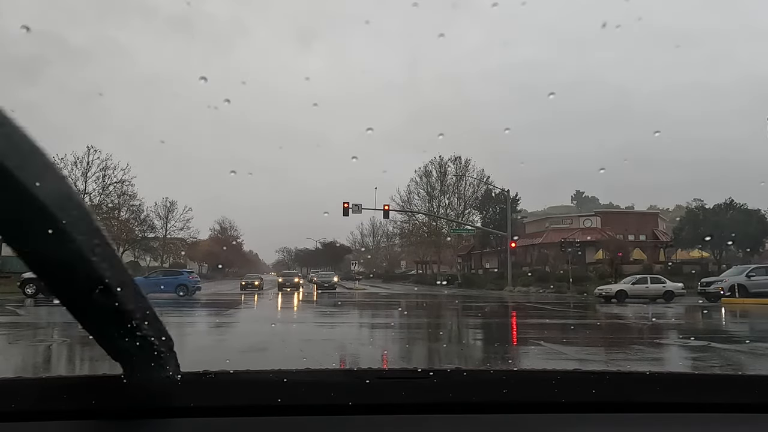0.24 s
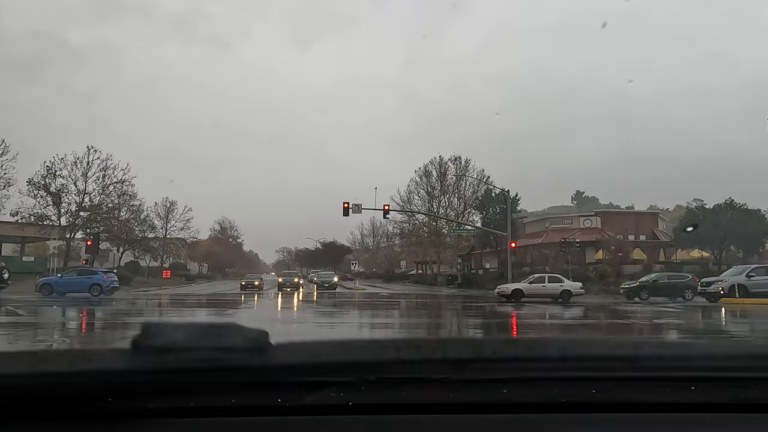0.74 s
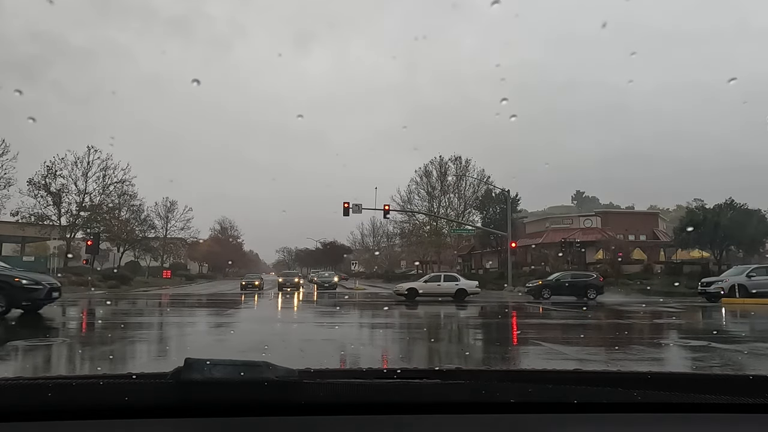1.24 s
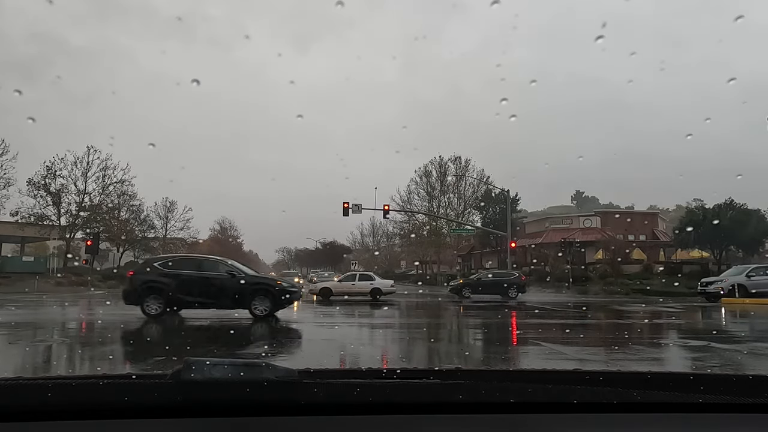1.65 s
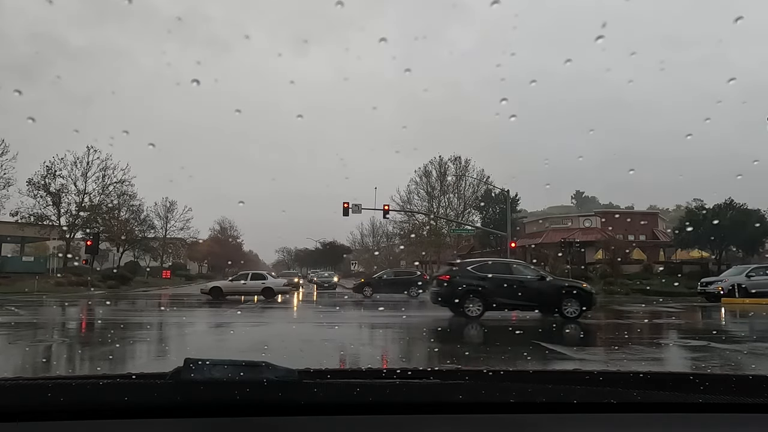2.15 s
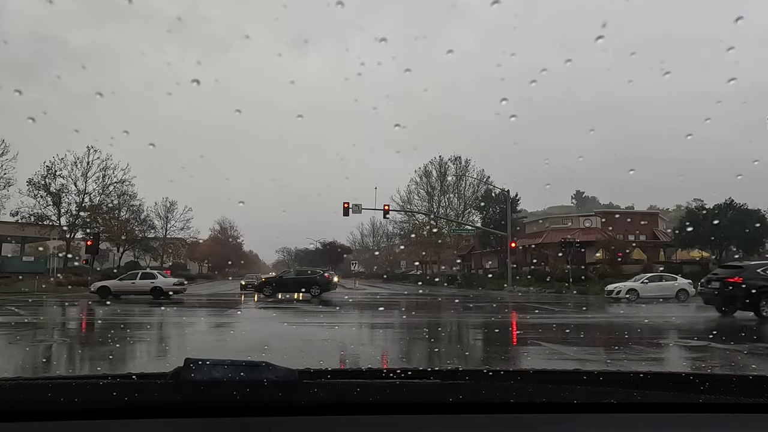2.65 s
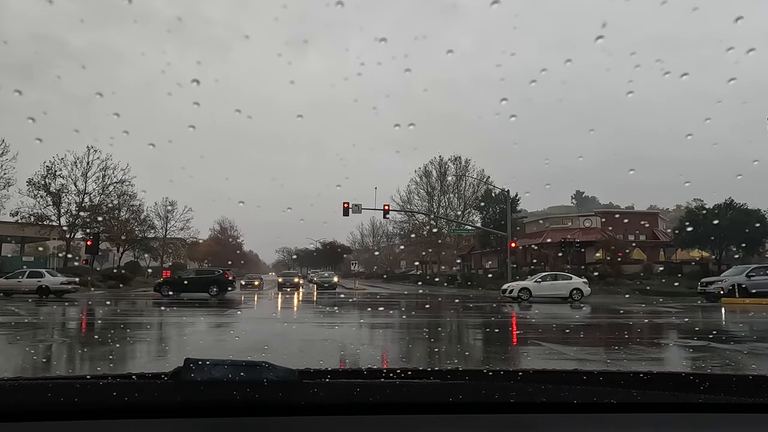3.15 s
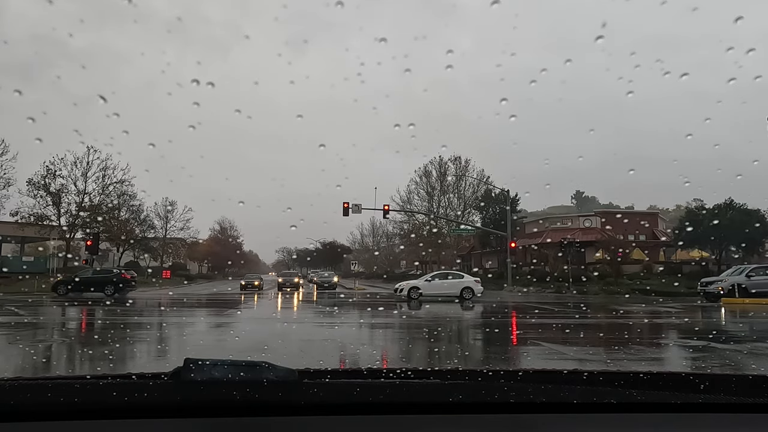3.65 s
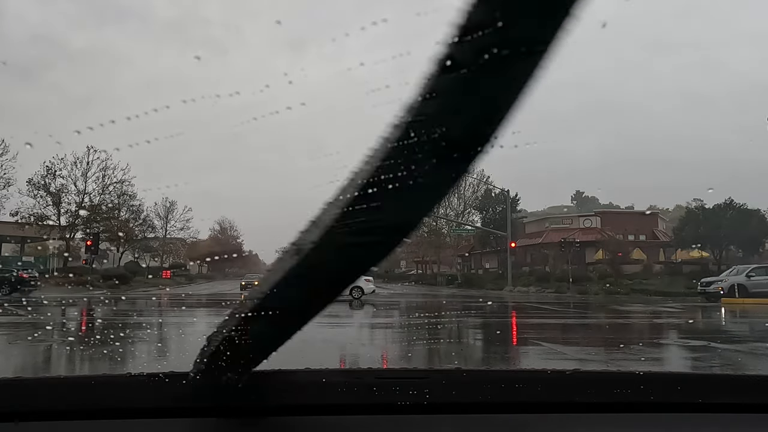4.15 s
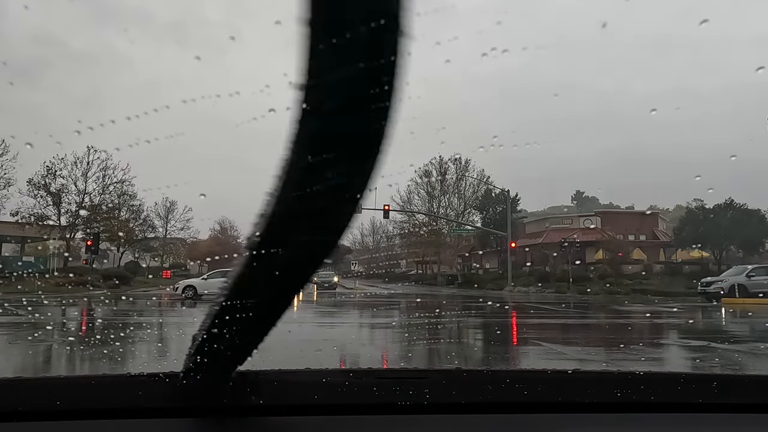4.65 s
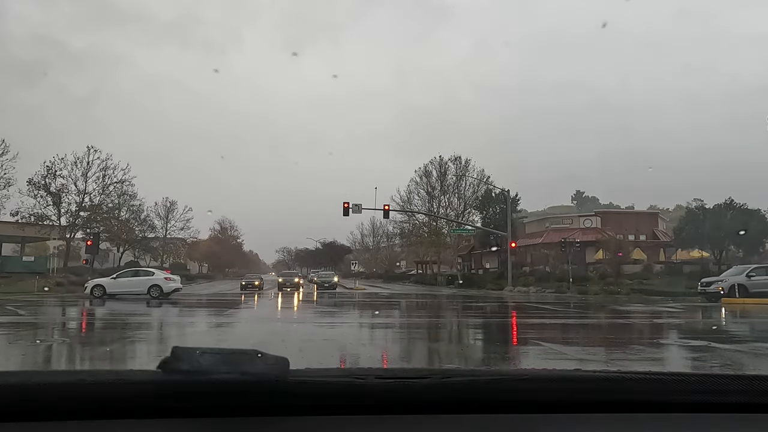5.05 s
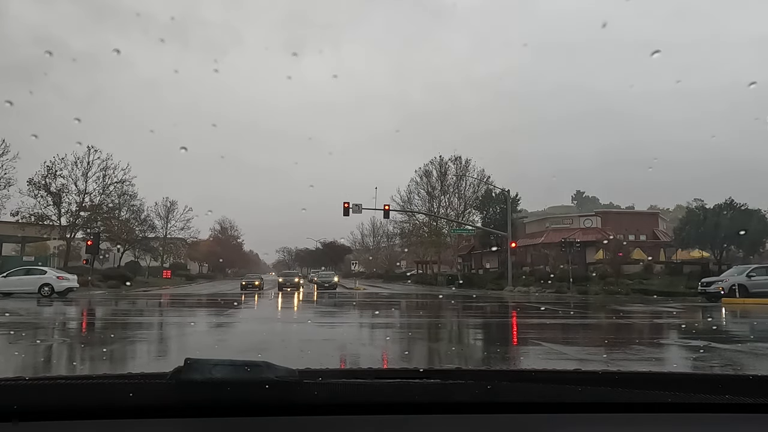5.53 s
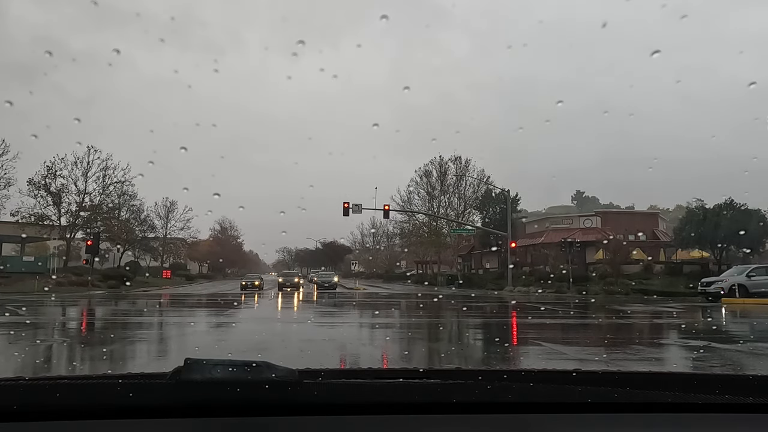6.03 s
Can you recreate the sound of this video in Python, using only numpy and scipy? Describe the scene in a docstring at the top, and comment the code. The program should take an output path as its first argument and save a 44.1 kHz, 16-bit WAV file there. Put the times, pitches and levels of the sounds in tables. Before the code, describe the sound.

Steady low engine idle and turn-signal clicking in a car cabin, with juddering wet wiper sweeps near the start and around four seconds.

```python
"""A six-cylinder engine idles and a turn signal ticks inside a car waiting at a wet junction.
The wipers sweep twice: the motor hums, rubber squeaks, judders and groans in stick-slip, and the arms knock.
Wet traffic hisses faintly outside; something crackles crisply close by, mostly near the end.
Hums are sines, squeals are stacks of partials, and the rest is noise or clicks coloured by what they strike."""
import sys
import numpy as np
from scipy import signal
from scipy.fft import rfft, irfft, next_fast_len
from scipy.io import wavfile
from scipy.ndimage import uniform_filter1d

SR = 44100
rng = np.random.default_rng(int(sys.argv[2]) if len(sys.argv) > 2 else 0)


def dump(signal):
    """Clip the signal to [-1, 1] and save it as 16-bit WAV at the path in sys.argv[1]."""
    limited = np.clip(np.atleast_2d(signal).T, -1, 1)
    pcm = np.round(limited * 32767).astype(np.int16)
    wavfile.write(sys.argv[1], SR, pcm)


N = 277389
TIME = np.arange(N) / SR  # seconds

# Scrape of rubber on the glass. Each row: frequency in Hz, relative density in dB per Hz.
RASP = [(250, -2.5), (550, 4), (800, 3), (1000, 1.5), (1350, -1.5), (1650, -6.5), (2200, -10.5),
        (2900, -27), (5000, -37)]
# Snap of the water film. Each row: frequency in Hz, relative density in dB per Hz.
SPRAY = [(1500, -13.5), (2500, 7), (3000, 4.5), (3700, 9), (4800, 4.5), (5600, -3.5), (6800, -8),
         (8000, -18), (9700, -35), (11500, -45), (16000, -47.5)]
# Crisp, brittle colour of crackles and fizz. Each row: frequency in Hz, relative density in dB per Hz.
CRISP = [(700, -7), (1600, 3.5), (2900, -10.5), (4300, 5.5), (5500, 4.5), (6500, -3), (7800, -4.5),
         (9500, -12), (12000, -21.5), (16000, -31)]
# Stereo lean of sounds on the glass. Each row: frequency in Hz, left minus right in dB.
GLASS_SIDE = [(200, -1), (400, 3), (1200, 3.5), (8000, 2), (15000, 8)]
# The groan before the arms turn, wavering with the grip.
# Each row: time in seconds, slips per second, level in dB, brightness in dB per octave.
GROAN_CURVE = [(4.238, 210, -9, -3.5), (4.262, 222, -18, -8), (4.288, 200, -6.5, -7), (4.305, 178, -9, -6),
               (4.328, 177, -10.5, 0.5), (4.35, 192, -8, -3.5), (4.372, 208, -11, -1),
               (4.408, 187, -5.5, -2.5), (4.434, 197, -11.5, -1), (4.456, 216, -14, 4.5),
               (4.49, 210, -18.5, 2)]

# One wiper cycle, out and back: starts and length in seconds; the first is already under way.
SWEEP_STARTS, SWEEP_S = [-.31, 3.93], 1.33


def from_db(db):
    """Decibels to gain."""
    return 10 ** (np.asarray(db) / 20)


def rms_one(x):
    """Scale to unit power."""
    return x / np.sqrt(np.mean(x ** 2) + 1e-20)


def in_time(rows):
    """Each column of a curve, drawn as straight lines through every sample."""
    s, *columns = np.transpose(rows)
    return [np.interp(TIME, s, column) for column in columns]


def at_hz(points, hz):
    """Read a spectrum on a log-frequency axis."""
    point_hz, value = np.array(points).T
    return np.interp(np.log(hz + 1e-6), np.log(point_hz), value)


def pan(side_db):
    """Left and right gains for a level difference, left minus right."""
    return from_db(np.array([[.5], [-.5]]) * side_db)


def drift(rate_hz):
    """Smooth random wandering with spread 1, computed every 40 samples."""
    step = 40
    r = np.exp(-2 * np.pi * rate_hz * step / SR)
    raw = rng.standard_normal(N // step + 2002)
    slow = signal.lfilter([1], [1, -2 * r, r * r], raw)[2000:]  # skip the filter's start
    return np.interp(np.arange(N) / step, np.arange(len(slow)), rms_one(slow))


def swell(start, length, attack, release, sag_db=0):
    """Rise, hold while sagging by so many dB a second, then fall 60 dB in the release time."""
    age = np.maximum(TIME - start, 0)
    held = np.minimum(age, length)
    released = np.maximum(age - length, 0)
    return np.minimum(age / attack, 1) * from_db(-sag_db * held - 60 * released / release)


def clicks(times, levels_db):
    """One impulse per contact."""
    out = np.zeros(N)
    samples = np.round(np.asarray(times) * SR).astype(int)
    out[np.clip(samples, 0, N - 1)] = from_db(levels_db)
    return out


def bounces(times, levels_db, gap, loss_db, count):
    """Each contact repeats a few times, weaker each time."""
    return sum(clicks(times + k * gap, levels_db - k * loss_db) for k in range(count))


def die_away(hits, t60):
    """An envelope that each hit kicks up and that then decays 60 dB in t60 seconds."""
    return signal.lfilter([1], [1, -from_db(-60 / (t60 * SR))], hits + 1e-18)


def ring(hits, hz, t60):
    """A resonant mode: a unit click sets a decaying sine of height 1 ringing."""
    r, w = from_db(-60 / (t60 * SR)), 2 * np.pi * hz / SR
    return signal.lfilter([0, np.sin(w)], [1, -2 * r * np.cos(w), r * r], hits + 1e-18)


def noise(spectrum, force=1, side=None, pulses=0):
    """A random force, plus any clean pulses, coloured by a causal body and most alike in both ears in the bass."""
    # Stereo width. Each row: frequency in Hz, left-right likeness from 0 to 1.
    likeness = [(70, .994), (250, .975), (500, .87), (1000, .82), (2000, .62), (8000, .62)]
    size = 2 * next_fast_len(N // 2 + 4096)
    hz = np.fft.rfftfreq(size, 1 / SR)
    gain = rms_one(from_db(at_hz(spectrum, hz)) / (1 + (hz / spectrum[-1][0]) ** 4))
    cepstrum = irfft(np.log(gain + 1e-9), size)
    body = np.exp(rfft(cepstrum * (1 + np.sign(np.fft.fftfreq(size)))))  # minimum phase: nothing sounds early
    # The middle gets the clean pulses, the stereo difference gets them with random signs and strengths.
    pulse_pair = pulses * np.array([np.ones(N), rng.standard_normal(N)])
    mid, apart = rfft(rng.standard_normal((2, N)) * force + pulse_pair, size)
    alike = np.clip(at_hz(likeness, hz), 0, 1)
    both = np.sqrt((1 + alike) / 2) * mid + np.sqrt((1 - alike) / 2) * apart * [[1], [-1]]
    side_db = at_hz(side, hz) if side else -.9
    return irfft(both * body * pan(side_db), size)[:, :N]


FIRING_HZ = 32.0  # steady idle, three firings a crank turn


def engine():
    """Sines at multiples of the crank rate; uneven combustion makes them waver, the lowest most."""
    # Low shudder. Each row: multiple of the crank rate, dB relative to the shudder level.
    shudder_orders = [(2, -6.5), (3, -3), (4, -7.5)]
    # Hum above it. Each row: multiple of the crank rate, dB relative to the hum level.
    hum_orders = [(6, -0.5), (6.5, -19), (9, -27.5), (12, -13), (18, -18.5), (24, -25), (28, -25.5),
                  (30, -23.5), (72, -34), (78, -41.5), (88, -41)]
    crank = 2 * np.pi * FIRING_HZ * TIME / 3
    out = 0
    for orders, level_db, depth in ((shudder_orders, -25, .2), (hum_orders, -24, .12)):
        for multiple, db in orders:
            phase = multiple * crank + rng.uniform(0, 2 * np.pi) + depth * drift(2)
            strength = from_db(level_db + db) * (1 + depth * drift(3.5))
            out = out + strength * np.sin(phase)
    return np.sqrt(2) * out * pan(-1.0)


def background(rumble_db=-31, throb=0.22, road_db=-56.5, traffic_swing_db=1.5):
    """Body rumble that throbs at twice the firing rate, and the fluctuating hiss of tyres on the wet road."""
    # Body rumble. Each row: frequency in Hz, relative density in dB per Hz.
    rumble_colour = [(12, -33.5), (22, -10.5), (38, -6), (52, -8.5), (68, 3.5), (80, -9.5), (98, -19),
                     (130, -14), (210, -15.5), (275, -24), (315, -18.5), (410, -26.5), (540, -27.5),
                     (800, -30.5), (1100, -42), (2000, -63.5)]
    # Wet road. Each row: frequency in Hz, relative density in dB per Hz.
    road_colour = [(600, -15), (1100, 2), (1650, 2.5), (2050, -4.5), (2900, -7.5), (3800, -6.5),
                   (4700, -9.5), (6000, -16.5), (7700, -23), (9500, -27.5), (11500, -47), (16000, -48.5)]
    firing = 2 * np.pi * FIRING_HZ * TIME
    rumble = from_db(rumble_db) * noise(rumble_colour) * (1 + throb * np.sin(2 * firing))
    road = from_db(road_db + traffic_swing_db * drift(10)) * noise(road_colour)
    return rumble + road


def wiper_motor(motor_hz=111.4, level_db=-29, waver=0.61, spin_up_s=0.44, hold_s=0.73, release_s=1.5):
    """The motor hums unsteadily through the bulkhead and eases off as the arms come back down."""
    load = sum(swell(s, hold_s, spin_up_s, release_s) for s in SWEEP_STARTS)
    hum = np.sqrt(2) * np.sin(2 * np.pi * motor_hz * TIME + waver * drift(32))
    return from_db(level_db) * load * (1 + waver * drift(41)) * hum * pan(-.9)


def friction(attack_s=.018, release_s=.12):
    """Strength of thrum, rasp and spray: a quiet glide on the water film through each sweep, plus the catches."""
    # The rubber catches and drags. Each row: start in seconds, length in seconds,
    # then thrum, rasp and spray in dB at the start of the catch, before the trims in drag().
    catches = [(0.141, 0.065, -28.5, -38, -46), (0.256, 0.018, -27, -38, -50.5),
               (0.93, 0.11, -34.5, -56, -63), (3.885, 0.049, -20, -34, -52.5),
               (4.005, 0.067, -21, -28, -61), (4.076, 0.073, -20, -28, -52), (4.154, .085, -19.5, -32, -42),
               (4.25, 0.043, -25.5, -29.5, -44), (4.292, .18, -26, -36.5, -48.5),
               (5.186, .05, -42, -54.5, -61)]
    glide_db = [-44.5, -66, -80.5]  # thrum, rasp, spray
    sags_db = np.array([[25.5], [-2.5], [3]])  # dB per second during a catch; the rasp grows slightly
    gliding = sum(swell(s, SWEEP_S, attack_s, release_s) for s in SWEEP_STARTS)
    power = np.outer(from_db(glide_db), gliding) ** 2
    for start, length, *levels_db in catches:
        shape = swell(start, length, attack_s, release_s, sags_db)
        power = power + (from_db(levels_db)[:, None] * shape) ** 2
    return np.sqrt(power)


def drag(thrum_trim_db=4.0, rasp_trim_db=6, fizz_trim_db=-18,
         jitter=0.13, uneven_db=0.5, slip_t60=0.0072, smooth=0.19):
    """The blade lets go in slips, less evenly the harder it thrums; each thumps the glass and snaps the water."""
    # Thump of the glass. Each row: frequency in Hz, relative density in dB per Hz.
    thrum_colour = [(60, -12.5), (120, 1), (200, 5.5), (300, -4), (380, -6.5), (480, -14.5), (800, -19.5),
                    (1600, -40)]
    resting_hz = 195.95  # mean slip rate outside the groan
    thrum, rasp, spray = friction()
    slip_hz = np.interp(TIME, *np.transpose(GROAN_CURVE)[:2], left=resting_hz, right=resting_hz)
    slip_hz = slip_hz * (1 + jitter * thrum / thrum.max() * drift(70))
    turns = np.floor(np.cumsum(slip_hz) / SR)
    slips = (np.diff(turns, prepend=0) > 0) * from_db(uneven_db * rng.standard_normal(N))
    chatter = rms_one(die_away(slips, slip_t60) + smooth)
    low = noise(thrum_colour, from_db(thrum_trim_db) * thrum * chatter)
    middle = noise(RASP, from_db(rasp_trim_db) * rasp * np.sqrt(chatter), GLASS_SIDE)
    high = noise(SPRAY, spray * chatter, GLASS_SIDE)
    hardest = rasp ** 2 / rasp.max()  # only the hardest rubbing fizzes
    fizz = noise(CRISP, from_db(fizz_trim_db) * hardest * chatter, GLASS_SIDE)
    return low + middle + high + fizz


def stick_slip(start, slip_hz, gain, bright_db, flutter_db=2.0, dispersion=0.61, upper_smear=.12):
    """Stick-slip for half a second: harmonics coloured by the windscreen, the upper ones unsteady."""
    # How the windscreen radiates a squeal. Each row: frequency in Hz, relative level in dB.
    windscreen = [(150, -11), (200, 9), (370, 2), (560, -1.5), (660, -16), (740, -5.5), (860, -27),
                  (1000, -18.5), (1150, -29), (1340, -29), (1700, -54), (4000, -92)]
    on = np.arange(SR // 2) + max(int(start * SR), 0)
    phase = 2 * np.pi * np.cumsum(slip_hz)[on] / SR
    k = np.arange(1, 15)[:, None]  # harmonic numbers
    tilt_db = np.broadcast_to(bright_db, N)[on] * np.log2(k)
    partials = from_db(at_hz(windscreen, k * slip_hz[on]) + tilt_db)
    partials = partials / np.sqrt(np.sum(partials ** 2, axis=0) / 2)
    flutter = rms_one(uniform_filter1d(rng.standard_normal(partials.shape), size=700))
    # Phase wander in radians, growing with each partial above the third.
    smear = upper_smear * np.maximum(k - 3, 0) * flutter[::-1]
    unsteady = from_db(flutter_db * np.log10(k) * flutter)
    waves = partials * unsteady * np.cos(k * phase - dispersion * k ** 2 + smear)
    side = pan(at_hz(GLASS_SIDE, k[:, 0] * np.mean(slip_hz[on])))
    out = np.zeros((2, N))
    out[:, on] = side @ waves * gain[on]
    return out


def slip_pulses(slip_hz, uneven_db=3.0):
    """One sharp pulse each time the rubber lets go, each of its own strength; about unit power."""
    turns = np.cumsum(slip_hz) / SR
    nearest = np.round(turns).astype(int)
    strength = from_db(uneven_db * rng.standard_normal(N)[nearest])
    triangle = np.maximum(1 - np.abs(turns - nearest) * SR / slip_hz, 0)
    return triangle * np.sqrt(SR / slip_hz) * strength


def squeals(attack_s=.01, release_s=.048):
    """The rubber locks into short squeals gliding in pitch; their slips scrape the glass in step."""
    # Each row: start in seconds, length in seconds, slips per second, glide in octaves per second, level in dB,
    # brightness in dB per octave, pitch jitter as a share, scrape level in dB.
    squeal_rows = [(0, 0.042, 480, -0.5, -36.5, 1, .01, -64),
                   (0.092, 0.017, 410, -1, -35.5, 13, 0.017, -47),
                   (0.14, 0.017, 333, -1.5, -24.5, -9, 0.022, -39.5),
                   (0.16, 0.044, 197, 0.5, -20.5, -6, .02, -37.5),
                   (0.186, 0.031, 290, 2, -28.5, 11.5, 0.026, -46),
                   (0.216, 0.056, 336, -0.8, -24, 1.5, 0.027, -38.5),
                   (0.267, 0.016, 240, -4.5, -26, -7, .04, -44),
                   (3.956, 0.047, 346, -1.8, -17.5, 10, .016, -36),
                   (4.001, 0.086, 280, 1, -21, -2.5, 0.038, -38.5),
                   (4.078, 0.032, 233, -2, -19, 9.5, 0.029, -27.5),
                   (4.113, 0.037, 330, 0.4, -18, 1, .018, -32),
                   (4.154, 0.049, 197, -1.5, -8.5, -7, .015, -33.5),
                   (4.209, 0.032, 174, 1, -15.5, -4.5, .015, -34.5)]
    # Scrape of a slip on wet glass. Each row: frequency in Hz, relative density in dB per Hz.
    scrape_colour = [(500, -12.5), (1000, 5.5), (1500, 1.5), (2100, -13), (2900, -18.5), (4400, -21),
                     (7500, -28.5), (10000, -40)]
    tones, pulses = 0, 0
    for start, length, hz, glide, level_db, bright_db, rough, scrape_db in squeal_rows:
        slip_hz = hz * 2 ** (glide * np.clip(TIME - start, 0, length)) * (1 + rough * drift(114))
        gate = swell(start, length, attack_s, release_s)
        tones = tones + stick_slip(start, slip_hz, gate * from_db(level_db), bright_db)
        pulses = pulses + gate * from_db(scrape_db) * slip_pulses(slip_hz)
    return tones + noise(scrape_colour, 0, GLASS_SIDE, pulses)


def knocks(thud_t60=0.077, clack_t60=0.065, click_t60=0.032, rebound_s=.016):
    """The arms turn over or park and rebound once: a dull body thud, a plastic clack and a linkage click."""
    # Each row: time in seconds, thud, clack and linkage click in dB, loss on the rebound in dB.
    knock_rows = [(0.071, -30, -31, -52.5, 14.5), (0.368, -24.5, -30, -36.5, 23.5),
                  (0.998, -19, -39, -40.5, 6.5), (3.822, -46, -40, -33, 9.5), (3.901, -12, -24, -41, 2),
                  (4.524, -14, -19, -38.5, 8.5), (5.249, -17.5, -37, -50, 7.5)]
    # Body thud. Each row: frequency in Hz, relative density in dB per Hz.
    thud_colour = [(40, -7), (100, 4.5), (170, 0.5), (250, -6.5), (380, -15), (600, -26), (1200, -35.5)]
    # Plastic clack. Each row: frequency in Hz, relative density in dB per Hz.
    clack_colour = [(200, -3), (500, 10.5), (1000, -0.5), (1700, -9.5), (2800, -21.5), (4500, -22),
                    (7500, -38), (11000, -60)]
    # Linkage click. Each row: frequency in Hz, relative density in dB per Hz.
    linkage_colour = [(600, -13), (1050, 2), (1300, -10.5), (1620, -3.5), (1950, -22), (4000, -35.5)]
    s, *levels_db, loss_db = np.transpose(knock_rows)
    thuds, clacks, joints = (bounces(s, db, rebound_s, loss_db, count=2) for db in levels_db)
    thud = noise(thud_colour, die_away(thuds, thud_t60))
    clack = noise(clack_colour, die_away(clacks, clack_t60), GLASS_SIDE)
    return thud + clack + noise(linkage_colour, die_away(joints, click_t60), GLASS_SIDE)


def flicks(wet_t60=0.012, crisp_t60=0.0057):
    """The blade's edge flicks over in short wet snaps, some with a strong crisp top."""
    # Each row: time in seconds, wet level in dB, crisp level in dB.
    flick_rows = [(.168, -25, -40.5), (.183, -28.5, -43), (0.191, -25, -47), (.941, -37.5, -60),
                  (1.019, -37, -64), (1.028, -37, -62), (3.902, -26, -49), (4.002, -31.5, -36),
                  (4.053, -36.5, -38), (4.062, -33.5, -32.5), (4.103, -28.5, -28.5), (4.113, -28.5, -29),
                  (4.142, -32, -30.5)]
    # Wet snap. Each row: frequency in Hz, relative density in dB per Hz.
    wet_colour = [(500, -4.5), (900, 6.5), (2700, 6), (3700, -9.5), (6500, -14.5), (10000, -35)]
    # Its crisp top. Each row: frequency in Hz, relative density in dB per Hz.
    splash_colour = [(2500, -10), (4500, 7.5), (7000, 0), (9500, -7.5), (11500, -25.5), (16000, -34.5)]
    s, *levels_db = np.transpose(flick_rows)
    wet, crisp = (clicks(s, db) for db in levels_db)
    snap = noise(wet_colour, die_away(wet, wet_t60), GLASS_SIDE)
    return snap + noise(splash_colour, die_away(crisp, crisp_t60), GLASS_SIDE)


def turn_signal(vary_db=1.05, tick_t60=0.07, tock_t60=0.075):
    """The relay ticks brightly pulling in and tocks dropping out; its housing rings low under both."""
    # Contact pulling in, once a blink and not quite evenly: times in seconds.
    pull_in_s = [0.657, 1.325, 2.006, 2.695, 3.375, 4.735, 5.406, 6.096]
    # Contact dropping out: times in seconds.
    drop_out_s = [0.316, .995, 1.675, 2.345, 3.025, 3.715, 5.065, 5.756]
    # Housing modes. Each row: frequency in Hz, t60 in seconds, dB above the pull-in, dB above the drop-out.
    housing_modes = [(487, 0.1, 6, 11.5), (506, 0.1, 1, 10.5)]
    # Contact pulling in, scattered by the dashboard. Each row: frequency in Hz, relative density in dB per Hz.
    tick_colour = [(900, -12.5), (1350, -4.5), (2050, -22), (2650, -11.5), (3050, -23), (3550, -10),
                   (4000, -22.5), (4480, 1.5), (4900, -4.5), (5550, -15.5), (6100, -33), (9600, -32.5),
                   (10500, -58.5)]
    # Contact dropping out. Each row: frequency in Hz, relative density in dB per Hz.
    tock_colour = [(900, -7.5), (1450, 1.5), (2050, -15), (2600, -8.5), (3050, -18), (3600, -9.5),
                   (4000, -18), (4550, -9), (5500, -27), (7000, -27), (9650, -18.5), (10600, -37)]
    pull_in, drop_out = (clicks(s, mean_db + vary_db * rng.standard_normal(len(s)))
                         for s, mean_db in ((pull_in_s, -40), (drop_out_s, -47.5)))
    housing = 0
    for hz, t60, in_db, out_db in housing_modes:
        housing = housing + ring(from_db(in_db) * pull_in + from_db(out_db) * drop_out, hz, t60)
    tick = noise(tick_colour, die_away(pull_in, tick_t60))
    tock = noise(tock_colour, die_away(drop_out, tock_t60))
    return housing + (tick + tock) * pan(1.5)


def crackles(snap_t60=0.02, top_t60=0.055, tail_t60=0.1, tail_db=-17, grain_db=2.5):
    """Small bright snaps close by with a short cabin tail, over a grainy rustle under the flurries."""
    # Each row: time in seconds, level in dB, glassy top in dB.
    crackle_rows = [(.596, -53.5, -68), (4.853, -50.5, -65), (5.245, -53, -54), (5.364, -45.5, -63),
                    (5.395, -43.5, -63), (5.411, -42, -58), (5.443, -36.5, -55), (5.465, -35, -47),
                    (5.478, -32.5, -54), (5.899, -54, -64), (5.915, -47, -70), (5.933, -44.5, -67),
                    (5.959, -52, -71), (5.994, -52, -67), (6.249, -40, -40)]
    # Soft rustles. Each row: start in seconds, length in seconds, level in dB.
    rustle_rows = [(5.384, 0.065, -57), (5.47, 0.11, -55.5), (5.91, 0.038, -58)]
    # Glassy top. Each row: frequency in Hz, relative density in dB per Hz.
    glassy_colour = [(6300, -8.5), (7800, 0.5), (9500, -9), (10600, -14), (16000, -11)]
    s, level_db, top_db = np.transpose(crackle_rows)
    snaps = clicks(s, level_db)
    force = die_away(snaps, snap_t60) + from_db(tail_db) * die_away(snaps, tail_t60)
    rustle = sum(from_db(db) * swell(start, length, attack=.02, release=.17) for start, length, db in rustle_rows)
    rustle = rustle * rms_one(from_db(grain_db * drift(160)))
    top = noise(glassy_colour, die_away(clicks(s, top_db), top_t60), GLASS_SIDE)
    return noise(CRISP, force + rustle) * pan(3.8) + top


def groan(rough=.017, ring_t60=0.01, snap_t60=0.0062, uneven_db=3.5):
    """The slowing blade groans; each slip rings its rubber lip, whose resonance moves, and snaps the water film."""
    # Resonance of the lip as it bends. Each row: time in seconds, mean frequency in Hz, level in dB.
    lip_curve = [(4.25, 1060, -33), (4.28, 1650, -17.5), (4.32, 1603, -26.5), (4.36, 1360, -26.5),
                 (4.389, 1450, -15.5), (4.42, 1440, -24.5), (4.456, 1450, -19), (4.49, 1390, -33)]
    lip_scatter, lip_top_hz = .04, 3000  # share of change from slip to slip; the rubber damps all above
    spray_db, snap_db, scrape_db = -35.5, -45.5, -39.5  # noisy spray; clean pulses in the water and on the glass
    grip_share = .5  # the snaps swell by this share of the lip's swing in dB
    hz, level_db, bright_db = in_time(GROAN_CURVE)
    lip_hz, lip_db = in_time(lip_curve)
    start, end = GROAN_CURVE[0][0], GROAN_CURVE[-1][0]
    gate = swell(start, end - start, attack=.011, release=.1)
    force = gate * from_db(uneven_db * drift(90))

    slip_hz = hz * (1 + rough * drift(110))
    turns = np.cumsum(slip_hz) / SR
    since_slip = turns % 1 / slip_hz  # seconds
    slip_count = turns.astype(int)
    scatter = 1 + lip_scatter * rng.standard_normal(slip_count[-1] + 1)
    lip_hz = lip_hz * scatter[slip_count]
    lip = from_db(lip_db - 60 * since_slip / ring_t60) * np.sin(2 * np.pi * lip_hz * since_slip)
    lip = signal.sosfilt(signal.butter(4, lip_top_hz, fs=SR, output="sos"), lip)

    grip = from_db(grip_share * (lip_db - np.mean(np.transpose(lip_curve)[2])))
    pulses = gate * grip * slip_pulses(slip_hz)
    spray = force * grip * from_db(spray_db - 60 * since_slip / snap_t60)
    snaps = noise(SPRAY, spray, GLASS_SIDE, from_db(snap_db) * pulses)
    scrapes = noise(RASP, 0, GLASS_SIDE, from_db(scrape_db) * pulses)
    tone = stick_slip(start, slip_hz, gate * from_db(level_db), bright_db)
    return tone + force * lip * pan(3.6) + snaps + scrapes


def scene():
    """Everything as heard from behind the windscreen."""
    wipers = wiper_motor() + drag() + squeals() + knocks() + flicks() + groan()
    return engine() + background() + wipers + turn_signal() + crackles()


def record(dry, attack_s=0.0057, limit_db=-13.5, limit_share=.82, recover_db_per_s=5, cutoff_hz=15700):
    """The level ducks by a share of any excess and recovers slowly; the top is cut steeply."""
    power = np.abs(uniform_filter1d(np.mean(dry ** 2, axis=0), size=1500))
    level_db = 10 * np.log10(power + 1e-12)
    excess_db = limit_share * np.maximum(level_db - limit_db, 0)
    recovery_db = recover_db_per_s * TIME
    held_db = np.maximum.accumulate(excess_db + recovery_db) - recovery_db
    r = np.exp(-1 / (attack_s * SR))
    ducked = dry * from_db(-signal.lfilter([1 - r], [1, -r], held_db))
    fade_in = np.minimum(TIME / .005, 1)
    return signal.sosfilt(signal.cheby2(12, 70, cutoff_hz, fs=SR, output="sos"), ducked * fade_in)


dry = scene()
out = record(dry)
dump(out)
```